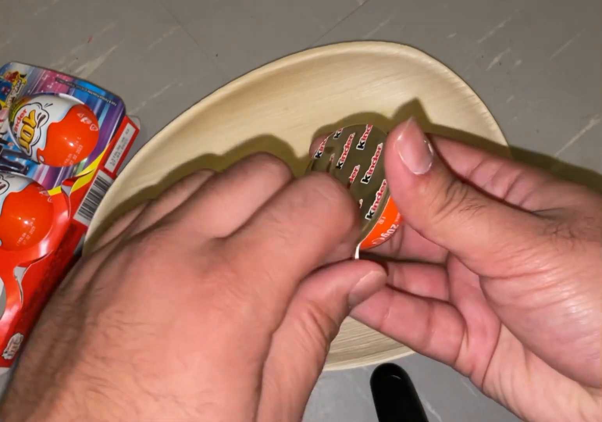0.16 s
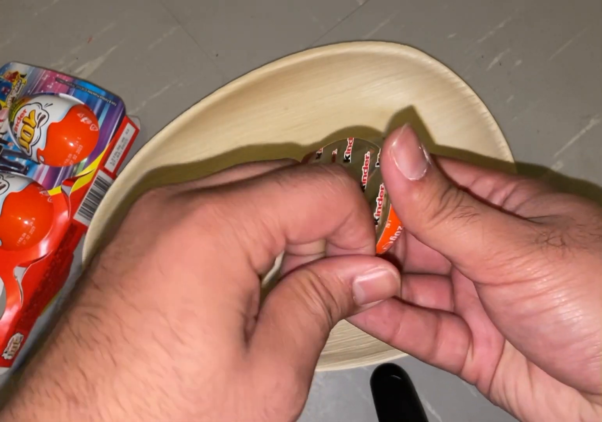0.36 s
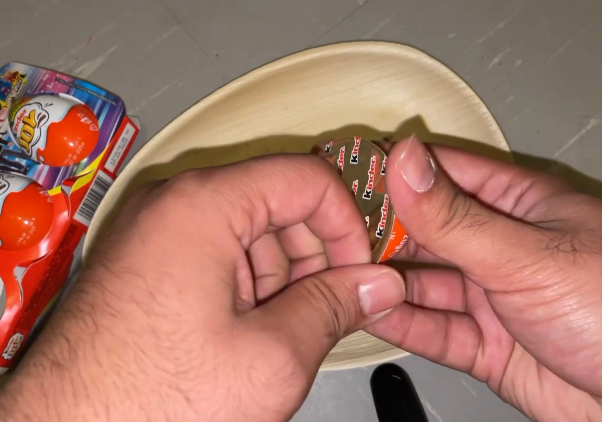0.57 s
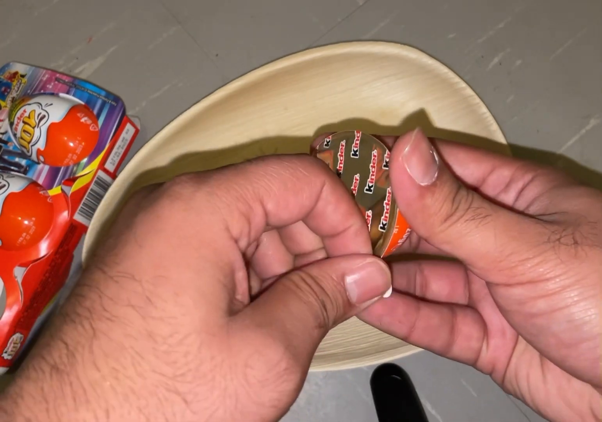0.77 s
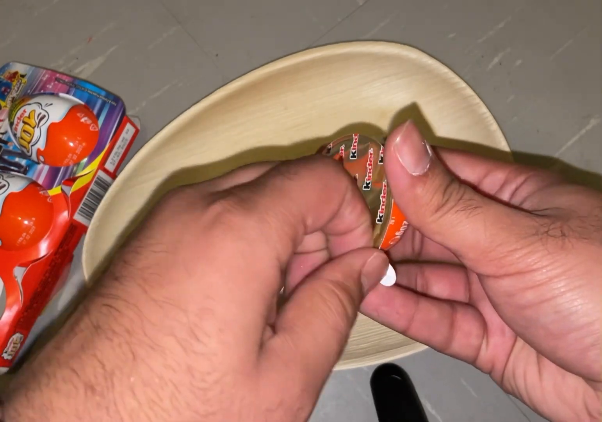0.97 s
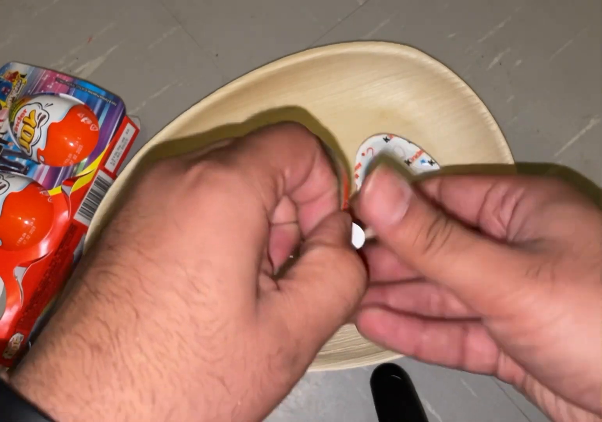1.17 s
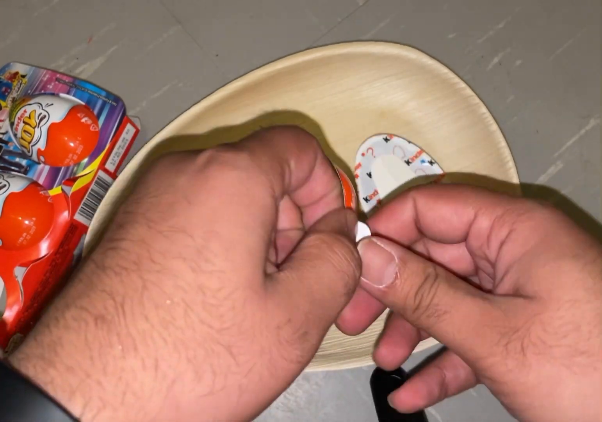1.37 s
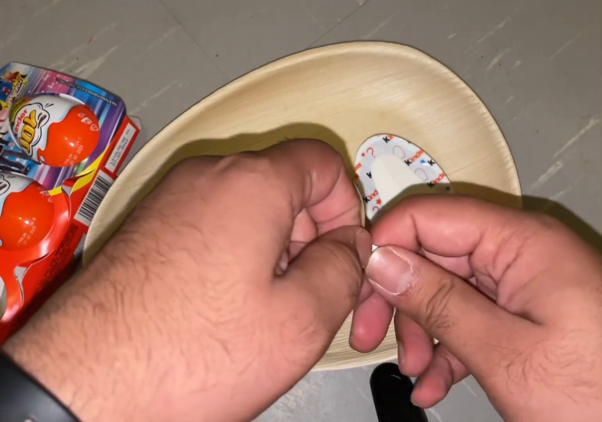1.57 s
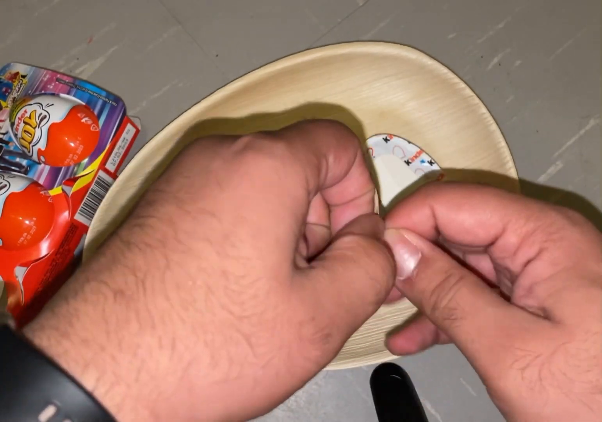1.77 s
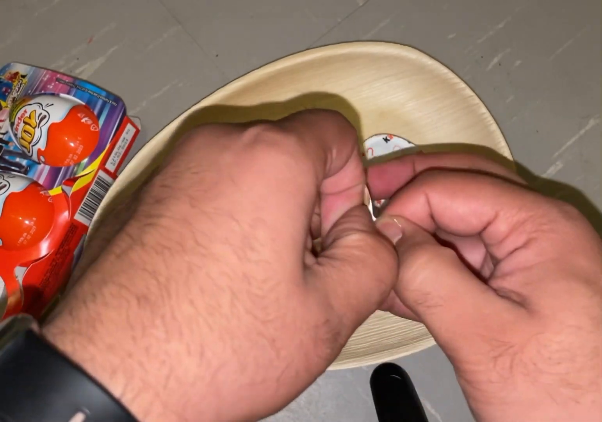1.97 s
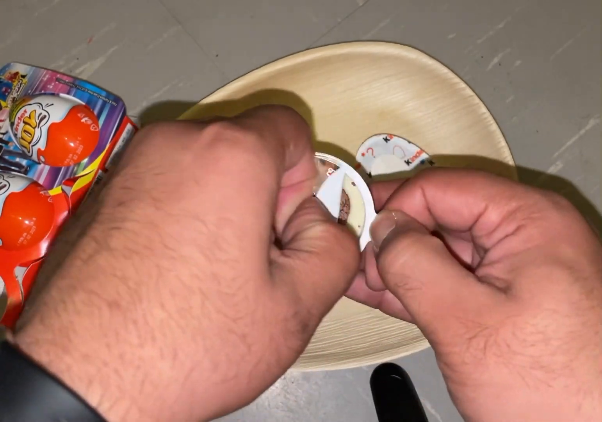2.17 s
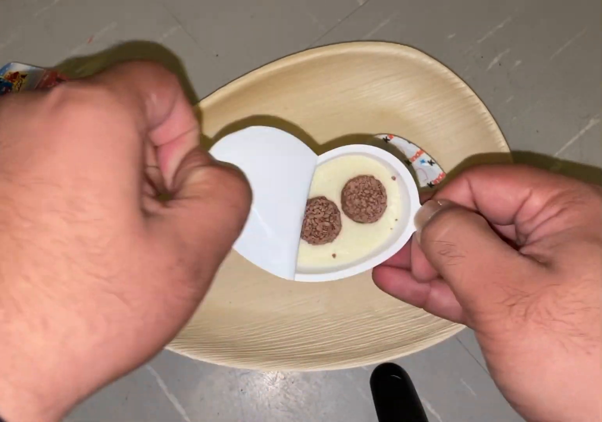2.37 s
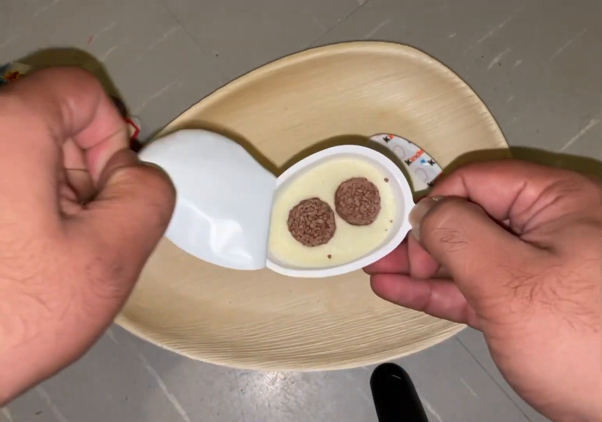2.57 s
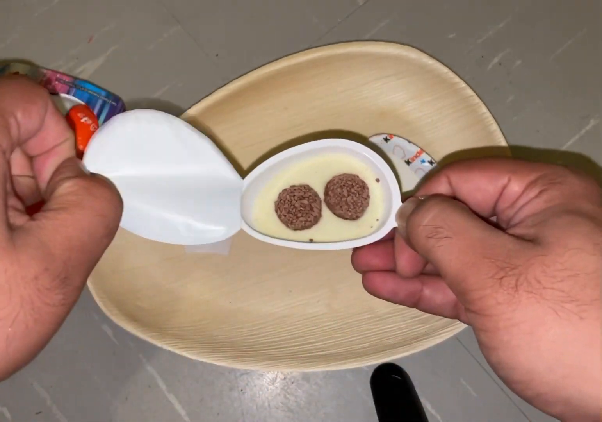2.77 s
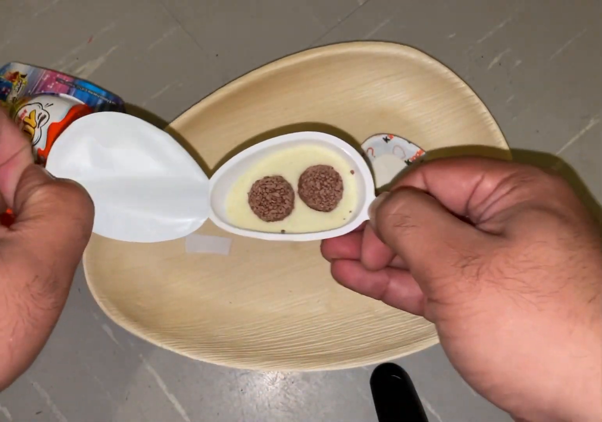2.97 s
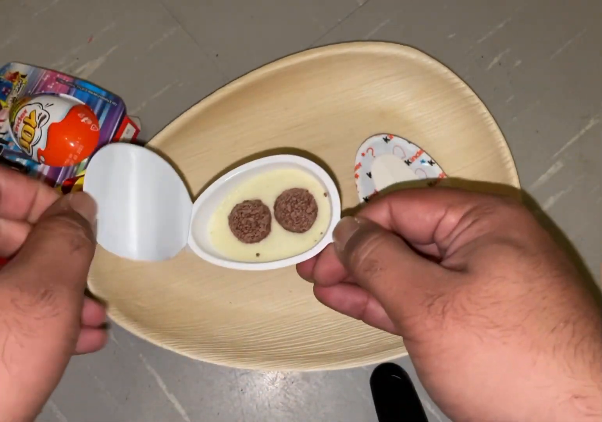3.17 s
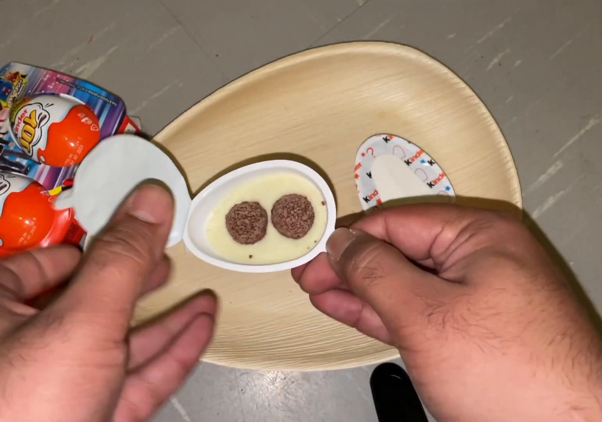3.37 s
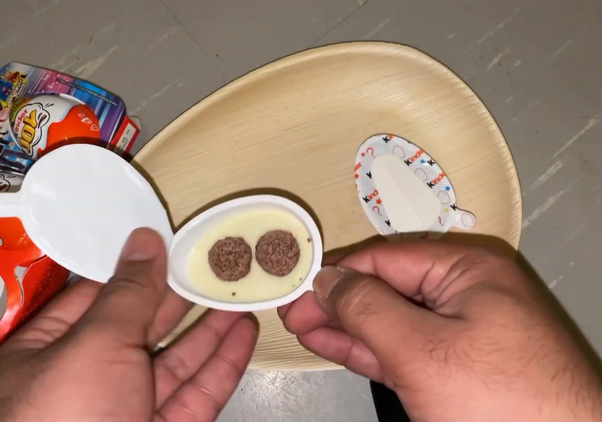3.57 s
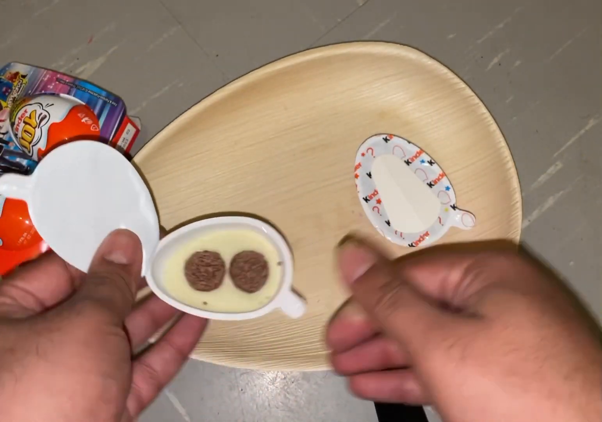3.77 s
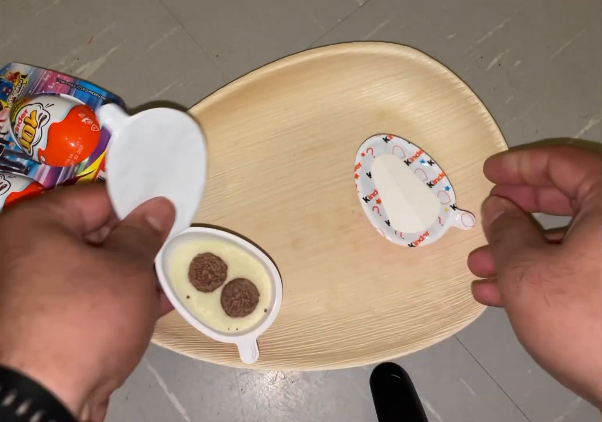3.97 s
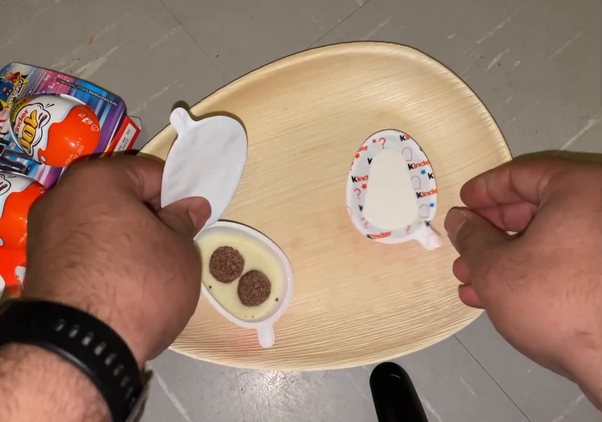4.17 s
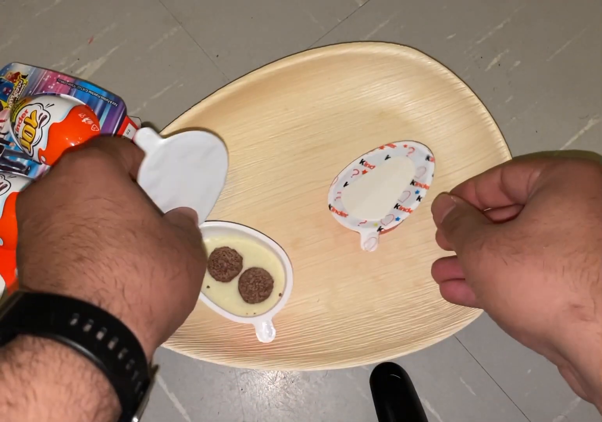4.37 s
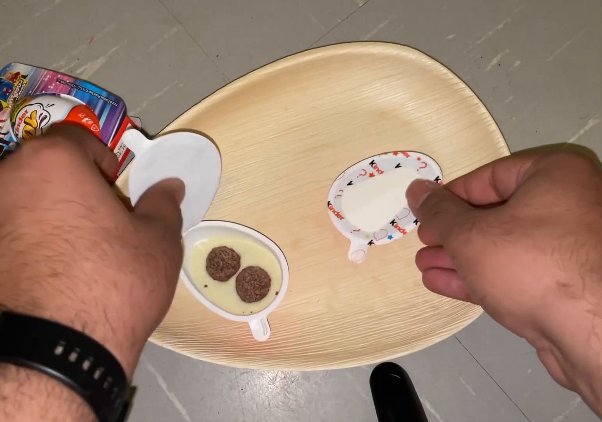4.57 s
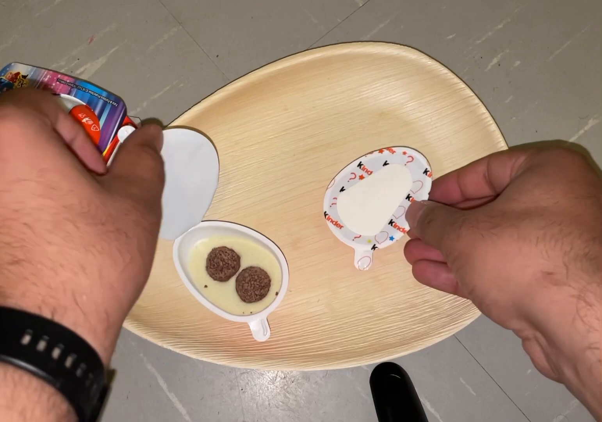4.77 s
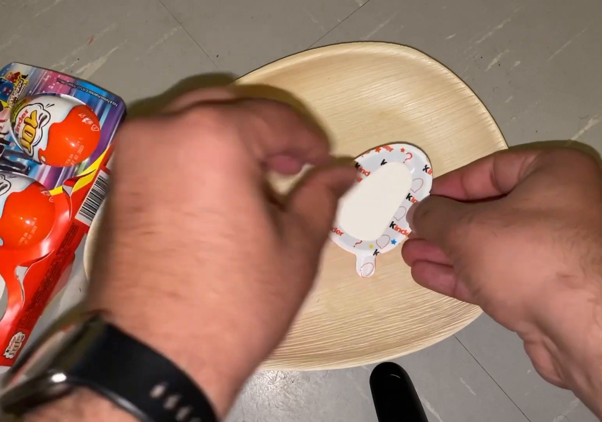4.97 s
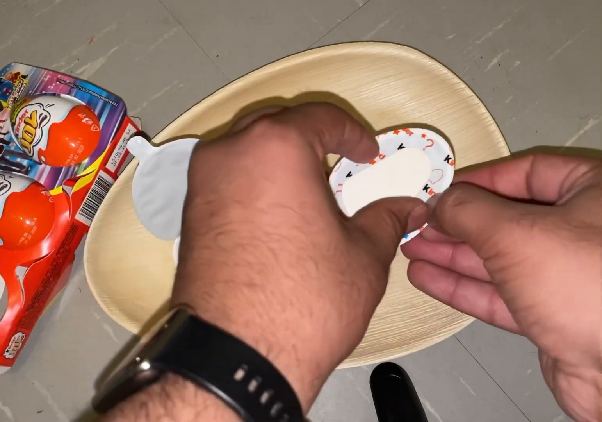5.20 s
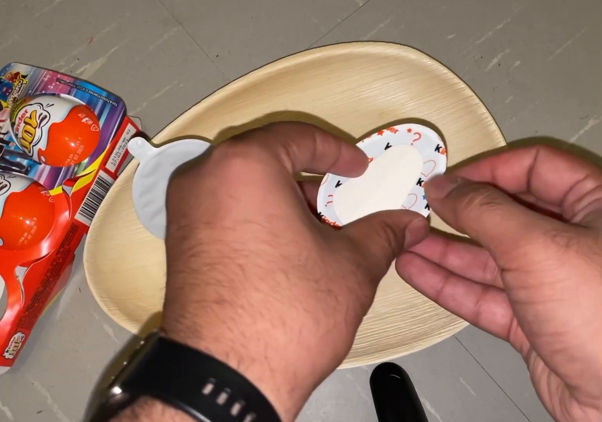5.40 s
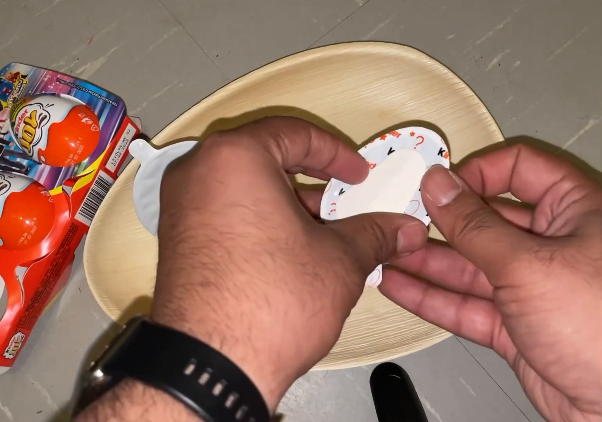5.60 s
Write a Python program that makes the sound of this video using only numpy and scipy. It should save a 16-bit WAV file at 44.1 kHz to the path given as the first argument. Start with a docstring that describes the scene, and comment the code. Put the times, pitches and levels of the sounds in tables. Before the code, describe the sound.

Quiet finger rubbing and tiny ticks, then a foil lid snaps and tears off a small plastic cup, followed by soft crinkles and a light set-down.

```python
"""In a small room, hands peel the foil lid off a small plastic cup above a plate on a table, close to the microphone.
The seal gives way in a few sharp snaps, cracks and noisy flutter that ring the cup; the loose lid crinkles in ticks.
Fingers rub, catch and let go, as noise broken into tiny slips. The cup knocks in the hand and is set down on
the plate, both as damped tones. Nearby surfaces and the room answer over a faint steady hush."""
import sys
import numpy as np
from scipy import signal
from scipy.fft import rfft, irfft
from scipy.io import wavfile
from scipy.ndimage import uniform_filter1d

SR = 44100
rng = np.random.default_rng(int(sys.argv[2]) if len(sys.argv) > 2 else 0)


def put_to_file(sound):
    """Save the sound as 16-bit audio at rate SR, in the file named by the first command-line argument."""
    columns = np.atleast_2d(sound).T  # one column per channel
    safe = np.clip(columns, -1, 1)
    whole_steps = np.round(safe * 32767)
    wavfile.write(sys.argv[1], SR, whole_steps.astype(np.int16))


N = 248724

# likeness of left and right in the room's sound: (frequency [Hz], share [0 to 1])
ROOM_LIKENESS = [(100, 0.92), (600, 0.6), (1500, 0.033), (9000, 0.06), (12000, 0.74)]


def gain_of(db):
    """Decibels to amplitude."""
    return 10 ** (np.asarray(db) / 20)


def evened(x):
    """Scales to rms 1."""
    return x / np.sqrt(np.mean(abs(x) ** 2) + 1e-20)


def read(points, hz):
    """Joins points by straight lines on a log-frequency axis."""
    f, value = np.transpose(points)
    return np.interp(np.log(hz + 1), np.log(f + 1), value)


def add(mix, s, sound):
    """Mixes a stereo sound in at time s."""
    part = mix[:, max(round(s * SR), 0):][:, :sound.shape[1]]
    part += sound[:, :part.shape[1]]


def bins(size):
    """Frequencies of a spectrum of that many samples."""
    return np.fft.rfftfreq(size, 1 / SR)


def causal(db):
    """The minimum-phase filter with this gain: it rings only after it is struck."""
    log_gain = np.log(gain_of(np.maximum(db, -100)))
    circle = np.concatenate([log_gain, log_gain[-2:0:-1]])
    return np.exp(np.conj(signal.hilbert(circle)))[:len(db)]


def paired(z, same):
    """Makes two unrelated spectra alike by the share same."""
    same = np.clip(same, -1, 1)
    return np.array([z[0], same * z[0] + np.sqrt(1 - same ** 2) * z[1]])


def panned(db):
    """Left and right gains for a level difference, left louder."""
    return gain_of(np.array([[db], [-db]]) / 2)


def resonate(x, hz, q):
    """A resonance of gain 1 that follows the pitch curve hz."""
    turn = np.exp(2j * np.pi * np.cumsum(hz) / SR)
    r = np.exp(-np.pi * hz.mean() / q / SR)
    # the pitch is shifted down to zero, smoothed there and shifted back
    return 2 * (turn * signal.lfilter([1 - r], [1, -r], x / turn)).real


def hush(level_db=-67, side_db=2):
    """The low steady rumble and faint hiss of the room, as shaped noise."""
    # colour of the room's hush: (frequency [Hz], relative density [dB per Hz])
    hush_colour = [(20, -11.5), (50, 3.5), (80, 0.5), (160, -10), (380, -14.5), (750, -29.5), (2000, -32.5),
                   (6500, -41), (9000, -51), (12500, -32), (16000, -51)]
    hz = bins(N)
    z = paired(rfft(rng.standard_normal((2, N))), read(ROOM_LIKENESS, hz))
    noise = evened(irfft(z * gain_of(read(hush_colour, hz)), N))
    return gain_of(level_db) * noise * panned(side_db)


def room(x, build_s=0.0034, size=256):
    """Dense reflections that build up quickly and die band by band."""
    # decay of the room: (frequency [Hz], time to fall by 60 dB [s])
    room_decay = [(150, 0.74), (600, 0.25), (1500, 0.16), (4000, 0.32), (14000, 0.13)]
    # the tail as heard at the microphone, with a hole near 8.7 kHz: (frequency [Hz], level [dB])
    tail_level = [(100, -11.5), (450, -6.5), (1100, -3), (4500, -7.5), (7000, -4), (8700, -25), (10800, -4),
                  (14000, -11)]
    count = SR * 3 // 4
    hz, t, z = signal.stft(rng.standard_normal((2, count)), SR, nperseg=size)
    decay = gain_of(-60 * t / read(room_decay, hz)[:, None])
    # each band keeps its level however long it rings
    decay *= gain_of(read(tail_level, hz))[:, None] / np.sqrt((decay ** 2).mean(1, keepdims=True) * count)
    spectra = paired(z, read(ROOM_LIKENESS, hz)[:, None]) * decay
    tail = signal.istft(spectra, SR, nperseg=size)[1]
    tail *= 1 - np.exp(-(np.arange(tail.shape[1]) / SR / build_s) ** 2)
    return signal.fftconvolve(x, tail, axes=1)[:, :N]


def nearby(x, size=1024, early_db=-12, fade_s=0.0017, count=8):
    """The plate, the table and the hands throw each sound back, 2 to 18 ms later and fading fast."""
    first = SR // 500
    at = first + np.arange(count) * first + rng.integers(0, first, count)
    taps = np.zeros(size)
    taps[at] = rng.choice([-1, 1], count) * np.exp(-at / SR / fade_s)
    return gain_of(early_db) * signal.oaconvolve(x, taps[None] / np.linalg.norm(taps))[:, :N]


def ports(hz):
    """Phase and level of a near source at the two microphone ports."""
    # lead of the left port: (frequency [Hz], phase [rad])
    port_lead = [(0, 0), (1300, .1), (2300, 1), (4500, 1.3), (5700, -1.1), (7600, -2.7), (9200, -3.4),
                 (10900, -5.2), (12300, -6.2)]
    # left over right: (frequency [Hz], level difference [dB])
    port_balance = [(100, -2), (600, 5), (2300, 3), (4400, 6), (8000, -0.5), (15000, -1)]
    sides = np.array([[1], [-1]])
    phase = np.exp(1j * sides * read(port_lead, hz) / 2)
    return phase * gain_of(sides * read(port_balance, hz) / 2)


def strokes(size=16384, slips_per_s=900, slip_db=1.5, slip_s=0.0005, smooth=0.45, same=1.0, skin_db=-88,
            q=2.3, glide_octaves=0.25, edge=3.5, clump_db=1.0, clump_s=0.0079):
    """Tiny slips come in clumps over a smooth hiss; the rubbed part rings higher as the stroke pulls it taut."""
    # strokes of fingers on foil and plastic, and of the peeling seal:
    # (middle [s], length between the 1/e points of pressure [s], level [dB], tilt [dB per octave],
    # resonance at mid-stroke [Hz], its height [dB]); the window below cuts the longest stroke short
    stroke_list = [(0.038, 0.14, -70, -4, 1400, 0), (0.164, 0.11, -62.5, -3, 3340, 1),
                   (0.576, 0.15, -75.5, 2, 3850, 7.5), (1.026, 0.25, -77, 1.5, 3970, 5.5),
                   (1.119, 0.18, -75.5, 16, 13100, 7), (1.55, 0.077, -67.5, 7, 1230, 15),
                   (1.985, 0.062, -72, 7.5, 4070, 5), (2.22, 0.019, -39.5, -3.5, 1510, -6),
                   (2.252, 0.013, -27.5, -0.5, 2830, 6), (2.33, 0.026, -33, -3.5, 3366, 16.5),
                   (2.474, 0.66, -60, -4, 2070, -2.5), (3.616, 0.048, -61, -1.5, 450, 9.5),
                   (4.139, 0.11, -57, -1.5, 6200, 7), (4.393, 0.14, -68.5, 4.5, 3720, 5.5),
                   (4.682, 0.076, -74, 2.5, 4060, 3.5), (4.742, 0.041, -64, -1, 1824, 5),
                   (4.892, 0.22, -79, -2.5, 1692, 3), (5.095, 0.15, -79, -9, 1206, 8.5),
                   (5.265, 0.13, -65, -3.5, 1807, 8.5), (5.336, 0.11, -59.5, 0, 1500, 6.5),
                   (5.424, 0.038, -58.5, -0.5, 4350, 3.5), (5.571, 0.19, -68.5, 3, 3080, 4)]
    # colour of rubbing: (frequency [Hz], relative density [dB per Hz])
    rub_colour = [(150, -22.5), (500, -5.5), (1400, -1.5), (4200, -2), (6500, -7.5), (8600, -3.5),
                  (10600, -5.5), (13000, -3.5), (16000, -24.5)]
    out, hz = np.zeros((2, N)), bins(size)
    t = (np.arange(size) - size / 2) / SR
    for s, length, db, tilt, part_hz, peak_db in stroke_list:
        slip_sizes = gain_of(slip_db * np.minimum(rng.exponential(1, size), 4))
        slips = slip_sizes * (rng.random(size) < slips_per_s / SR)
        grip = evened(signal.lfilter([1], [1, -np.exp(-1 / (slip_s * SR))], slips)) + smooth
        clumps = evened(uniform_filter1d(rng.standard_normal(size), round(clump_s * SR)))
        grip *= gain_of(clump_db * clumps)
        colour = gain_of(read(rub_colour, hz) + tilt * np.log2(1 + hz / 1000))
        noise = paired(rfft(rng.standard_normal((2, size)) * grip), same)
        rub = irfft(noise * colour * ports(hz))
        ring_hz = part_hz * 2 ** (glide_octaves * np.clip(t / length, -1, 1))
        rub += (gain_of(peak_db) - 1) * resonate(resonate(rub, ring_hz, q), ring_hz, q)
        pressure = np.exp(-abs(2 * t / length) ** edge)
        rub /= np.sqrt(np.average((rub ** 2).mean(0), weights=pressure))
        touch = gain_of(skin_db) * np.hanning(size)  # the skin brushes faintly before and after
        late = max(round(-(s + t[0]) * SR), 0)  # samples that fall before the start
        add(out, s + t[0], (rub * (gain_of(db) * pressure + touch))[:, late:])
    return out


def knocks(rise_cycles=0.55, side_db=3.5, ring_cycles=7.1, set_down_s=4.191):
    """Soft blows ring one quickly damped mode of the held cup; setting it down rings the plate."""
    # knocks of the cup in the hand and pops of the flexing lid: (time [s], level [dB], pitch [Hz])
    knock_list = [(2.196, -36, 1410), (2.318, -34.5, 328), (2.325, -27.5, 117), (2.363, -26, 345),
                  (2.551, -20, 308), (2.555, -28.5, 100), (2.7827, -21, 457), (2.8021, -28, 995),
                  (2.808, -43, 203), (2.815, -37.5, 900), (2.829, -34.5, 722), (3.103, -43.5, 183),
                  (5.207, -41.5, 330)]
    # modes of the plate: (pitch [Hz], level [dB], time to fall by 60 dB [s])
    plate_modes = [(92.2, -46.5, 0.3), (145, -46.5, 0.21), (322, -46, 0.078)]
    out, t = np.zeros((2, N)), np.arange(SR // 2) / SR
    # the hand damps a knock by 60 dB in ring_cycles
    held = [(s, db, hz, ring_cycles / hz) for s, db, hz in knock_list]
    plate = [(set_down_s, db, hz, t60) for hz, db, t60 in plate_modes]
    for s, db, hz, t60 in held + plate:
        decay = np.exp(-np.log(1000) * t / t60)
        rise = 1 - np.exp(-(t * hz / rise_cycles) ** 2)
        ring = np.sin(2 * np.pi * hz * t) * decay * rise
        add(out, s, gain_of(db) * ring * panned(side_db))
    return out


def cup(hz):
    """A direct path plus the ringing modes of the cup."""
    # resonances of the cup and its lid: (frequency [Hz], width [Hz], level over the direct path [dB])
    cup_modes = [(837, 32, -4), (983, 100, -4.5), (1410, 14, -6), (1950, 140, 2), (2550, 30, -10),
                 (3320, 750, -9), (4174, 540, -6.5)]
    return 1 + sum(gain_of(db) * 1j * hz * width / (f ** 2 - hz ** 2 + 1j * hz * width)
                   for f, width, db in cup_modes)


def snaps(size=4096, crack=0.48, crack_s=0.0048, same=0.82, rise=.42, rattle_db=3.5, lead_in_db=-28,
          grip_octaves=0.015, flutter_s=0.0015, halving_tilt=16, longest_s=0.0048, patch_q=1.3):
    """A patch of foil buckles: one crack, then milliseconds of rattling flutter; small patches ring higher."""
    # single snaps of foil and plastic: (time [s], level over 10 ms [dB], lowest resonance [Hz],
    # tilt above it [dB per octave])
    snap_list = [(0.1157, -55, 1470.0, 3.0), (0.12, -45, 1430, -0.5), (0.188, -39, 760, -3),
                 (0.37, -69.0, 500.0, 9), (0.607, -67, 910, -1), (0.762, -45.5, 11600, 2.5),
                 (0.7637, -54.5, 570, -1.0), (1.0588, -62.5, 910, -1), (1.08, -55.5, 1020, 6),
                 (1.4479, -70.5, 724, -2.5), (1.505, -73.5, 533, -3), (1.523, -72.5, 1290, 0.5),
                 (1.7059, -57, 290.0, 8), (1.795, -65, 586, 16), (2.0154, -55.5, 1840, -15),
                 (2.021, -57.7, 350.0, 6.5), (2.053, -33.5, 1880, -1.5), (2.055, -29, 2000, -22.5),
                 (2.0609, -33, 1780, -1.5), (2.0679, -25.5, 1830, -0.5), (2.088, -23.5, 1284, -5),
                 (2.2303, -18.5, 750, 3.5), (2.2333, -24.5, 810, 2), (2.277, -17.5, 970, -2.5),
                 (2.3132, -30.5, 750, -12), (2.3613, -34.5, 493, -6.5), (2.548, -27, 785, -3.5),
                 (2.7886, -47, 486, -8), (2.8022, -51, 1975, -37), (3.0699, -38.5, 520.0, -1.0),
                 (3.0931, -54.5, 900.0, -3.5), (3.104, -44.5, 660, -0.5), (3.1436, -33, 2310, 4),
                 (3.2879, -51.5, 391.0, -2.5), (3.3246, -48, 529, 2), (3.33, -47.5, 604, -5.5),
                 (3.622, -48, 797, -9.5), (3.6324, -53, 690, -7), (3.744, -56.5, 950.0, 0),
                 (3.752, -53.5, 950.0, 4.5), (4.0573, -68.1, 4030.0, -4.5), (4.0852, -54.5, 1270.0, -1),
                 (4.0933, -56, 312, 2.5), (4.0997, -55.5, 903, 0), (4.1182, -50.0, 1360.0, -2.5),
                 (4.1515, -44.5, 2500.0, -2), (4.1606, -46.0, 2390, -2.5), (4.173, -38.5, 2800.0, -4),
                 (4.184, -43.5, 280.0, -1.0), (4.489, -67, 400.0, 0.5), (4.636, -68, 350.0, 2.0),
                 (4.726, -64, 1462, -1), (5.201, -49.5, 1504, -2.5)]
    # colour of the foil: (frequency [Hz], relative density [dB per Hz])
    foil_colour = [(200, 7.5), (600, 1.5), (2200, -2.5), (6500, -4.5), (8500, -5), (10500, -4.5),
                   (12800, -6.5), (15000, -15.5), (16300, -27.5)]
    out, hz, t = np.zeros((2, N)), bins(size), np.arange(size) / SR
    lead, grain = size // 16, size // 256
    body = causal(read(foil_colour, hz)) * ports(hz)
    # a faint noise swells for a few milliseconds before each crack: made at the window's end, rolled to its start
    lead_in = gain_of(lead_in_db) * np.maximum(t - t[-lead], 0) * SR / lead
    for s, db, pitch_hz, tilt in snap_list:
        # bright snaps die sooner, halving per halving_tilt [dB per octave]; fingers damp the dullest
        length = min(flutter_s * 2 ** (-tilt / halving_tilt), longest_s)
        age = t / max(length, 1 / SR)
        rattle = gain_of(rattle_db * evened(uniform_filter1d(rng.standard_normal(size), grain)))
        swell = np.exp(-age) * (1 - np.exp(-age / rise)) + lead_in
        flutter = rng.standard_normal((2, size)) * rattle * swell
        click = crack * np.exp(-length / crack_s)  # the briefer the snap, the stronger its crack
        drive = click * np.exp(-2j * np.pi * hz * rise * length) + paired(rfft(flutter), same)
        r = hz / pitch_hz
        patch = -r ** 2 / (1 - r ** 2 + 1j * r / patch_q)  # radiates little below its lowest resonance
        slope = causal(tilt * np.log2(1 + r ** 2) / 2)
        held = cup(hz * 2 ** (grip_octaves * rng.uniform(-1, 1)))  # the shifting grip detunes the cup
        snap = np.roll(irfft(drive * patch * slope * body * held), lead, axis=1)
        spread = np.sqrt(SR / 100 / size)  # refers the level to 10 ms
        add(out, s - lead / SR, gain_of(db) * spread * evened(snap))
    return out


def scene(count=3):
    """The hands' work, its echoes and the quiet room."""
    handling = knocks() + strokes()
    near = snaps() + handling
    # a snap sounds a little different in each direction, so its echo is diffuse
    echo = sum(room(snaps() + handling) for _ in range(count)) / np.sqrt(count)
    return near + nearby(near) + echo + hush()


def record(dry, edge_hz=16100):
    """The recorder rounds off the highest peaks and limits the band."""
    low_pass = signal.firwin(511, edge_hz, window=("kaiser", 9), fs=SR)
    return signal.oaconvolve(np.tanh(dry), low_pass[None], "same")


dry = scene()
out = record(dry)
put_to_file(out)
```